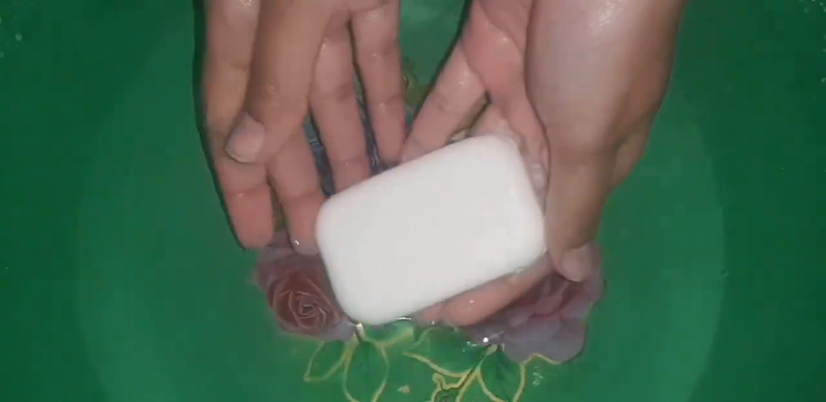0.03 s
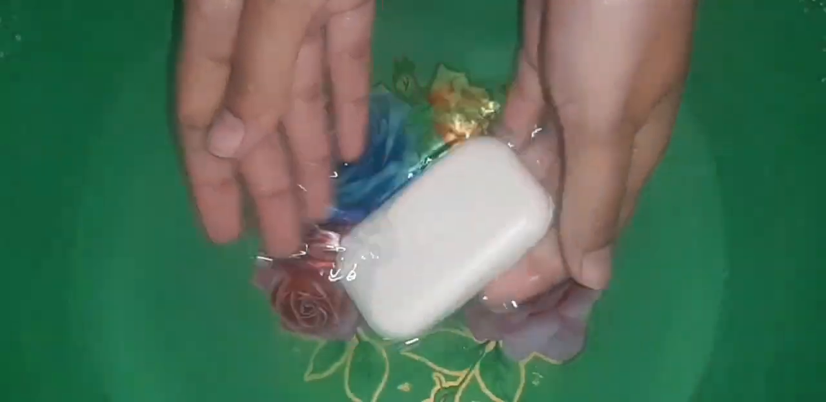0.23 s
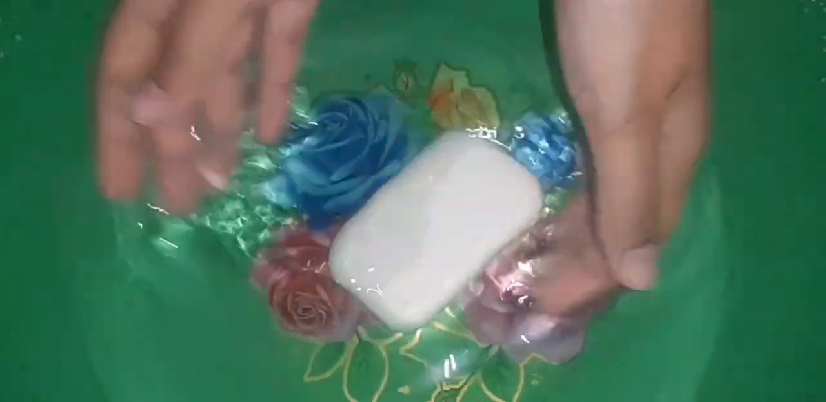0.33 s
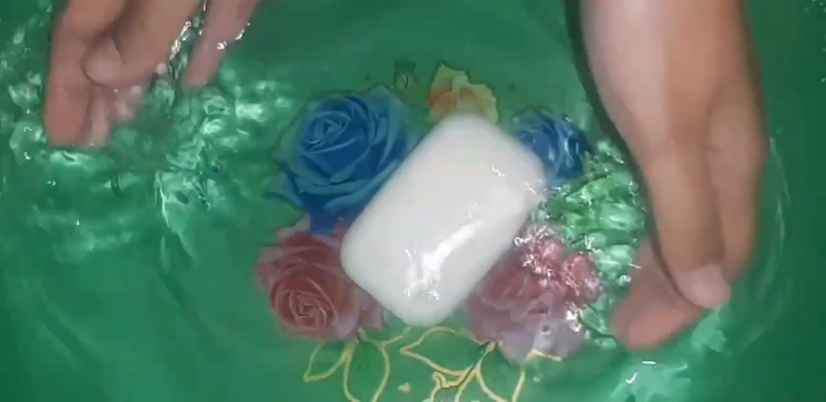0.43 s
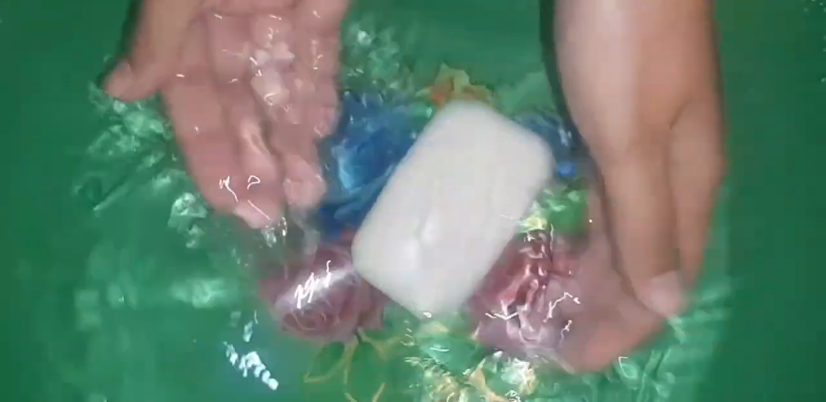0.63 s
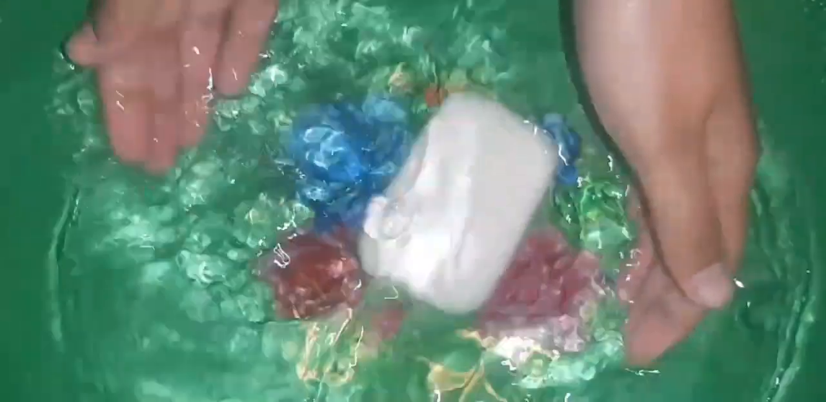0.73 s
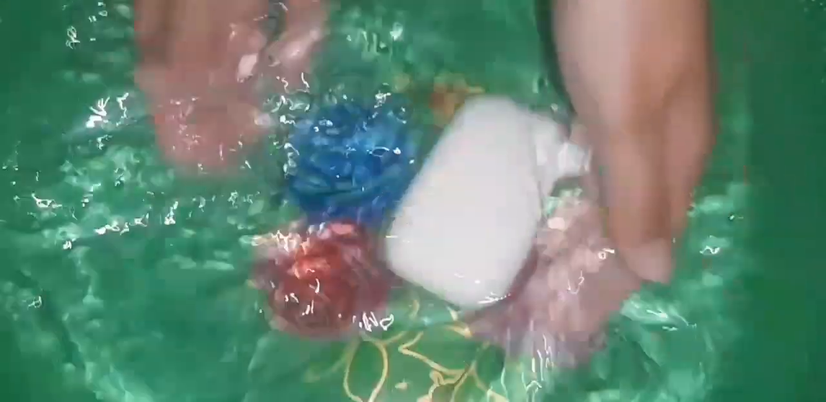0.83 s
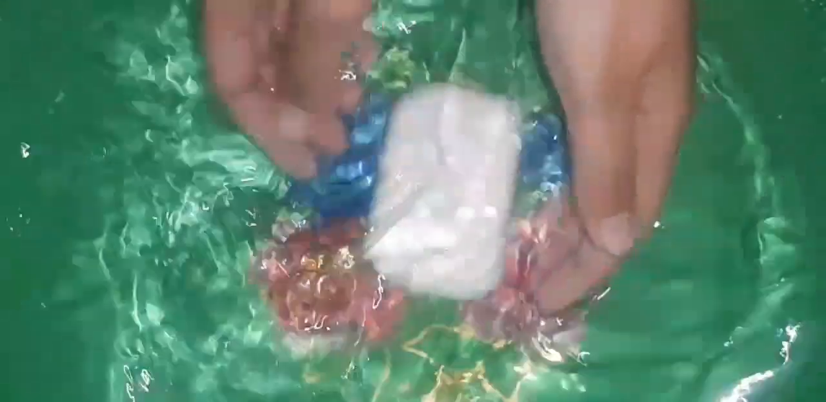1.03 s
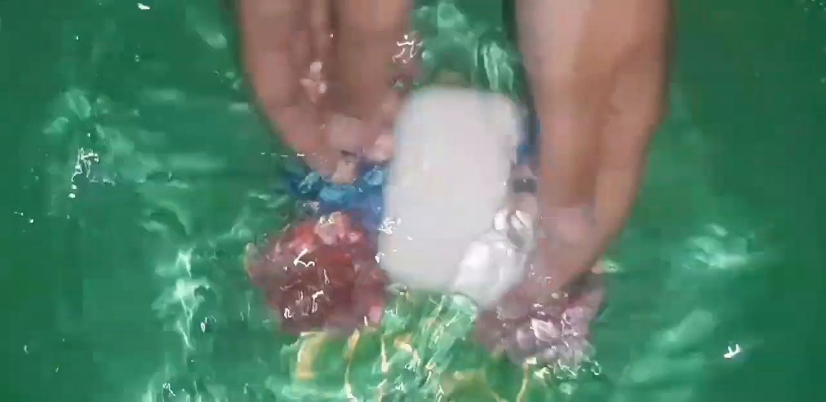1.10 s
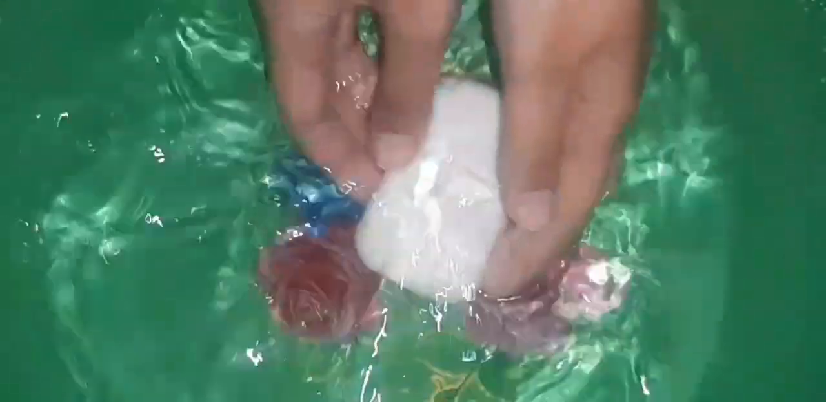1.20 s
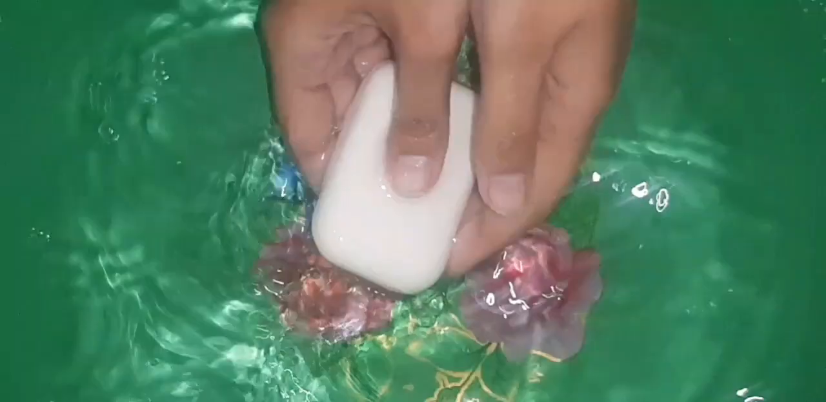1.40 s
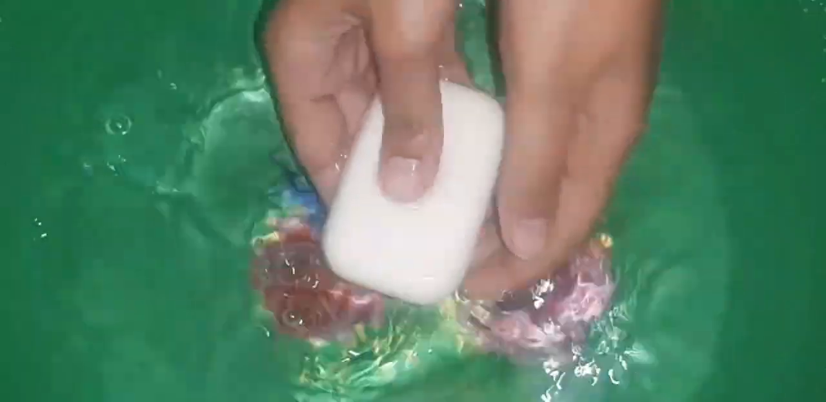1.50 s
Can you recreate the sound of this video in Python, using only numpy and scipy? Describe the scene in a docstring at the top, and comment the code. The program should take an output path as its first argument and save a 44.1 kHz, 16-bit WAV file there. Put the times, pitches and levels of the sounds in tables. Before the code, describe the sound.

Water splashes and plops in a plastic basin. First a bar of soap knocks hollowly on the bottom, then a hand splashes in with a brief fizz, thinning into faint drips, heard close in a small, quiet room.

```python
"""Four hollow knocks come first: a bar of soap strikes the bottom of a plastic basin of water and
excites its bending modes, later nudging it faintly. A hand splashes in, and trapped air pockets
resonate as plops of rising pitch; the splash fizzes, then thins into drips and soft lapping.
A small hard-walled room answers with reflections and a short reverberation, over a faint steady hiss."""
import sys
import numpy as np
from scipy import signal
from scipy.fft import rfft, irfft
from scipy.io import wavfile

SR = 44100
rng = np.random.default_rng(int(sys.argv[2]) if len(sys.argv) > 2 else 0)


def materialize(psi):
    """Save the field psi as 16-bit PCM at rate SR to the path in sys.argv[1].

    A 1-D psi becomes a single channel; in a 2-D psi each row is a channel.
    """
    bounded = np.clip(np.atleast_2d(psi).T, -1, 1)
    quanta = np.round(bounded * 32767).astype(np.int16)
    wavfile.write(sys.argv[1], SR, quanta)


N = 68355

# modes of the filled basin: (frequency [Hz], level [dB], base decay time T60 [s])
BASIN_MODES = [(237.3, -16.5, 0.2), (243.2, -5, 0.16), (282.3, -9.5, 0.16), (369, -5.5, 0.063),
               (424.2, -17, 0.17), (447.2, -2.5, 0.075), (478.8, -10, 0.061), (640, -14, 0.057),
               (732, -9, 0.04), (841.3, -3.5, 0.041), (906.5, -15, 0.041), (1106, -3, 0.031),
               (1284, 2.5, 0.018), (1534, -4, 0.031), (2133, 0, 0.012), (2209, -11.5, 0.041)]
# blows of the soap: (time [s], level [dB], contact bandwidth [Hz], low-mode gain [dB],
# favoured frequency [Hz], weakened frequency [Hz], low-mode lag [ms], low-mode decay factor [ratio],
# relative crack level [dB], left minus right [dB])
SOAP_BLOWS = [(0.2075, -9.5, 2600, 1, 882, 356, 1.3, 1, -16, 2.5),
              (0.3481, -13, 1049, -1, 403, 855, 0.48, 0.49, -32.5, 3),
              (0.3944, -16, 1650, -1.5, 630, 860, 5.1, 0.89, -39, 4),
              (0.4229, -9.5, 1280, -6.5, 409, 2150, 1.2, 0.49, -26, 0.5),
              (0.811, -39.5, 270, 3, 233.6, 450, 2.08, 0.79, -43, 8),
              (0.8227, -22.5, 2000, -19, 1228, 426, 0.36, 0.77, -14.5, 4),
              (1.101, -49.5, 1506, -3.5, 1230, 448, 1.45, 1, -32.5, 9)]


def soap_knocks(low_mode_hz=422, spot_octaves=0.11, favoured_db=7, weakened_db=-4.5, right_lag_ms=0.16):
    """Modal vibration: the contact spot weights the modes, and the low, water-loaded ones arrive later."""
    out, t = np.zeros((2, N)), np.arange(SR // 3) / SR
    for (start, db, bright_hz, low_db, favoured_hz, weakened_hz,
         lag_ms, stretch, crack_db, pan_db) in SOAP_BLOWS:
        sound = undb(crack_db) * tick(t, decay_s=0.0037, high_hz=bright_hz * 1.3, low_hz=700)
        for hz, mode_db, t60 in BASIN_MODES:
            lowness = 1 / (1 + (hz / low_mode_hz / 1.6) ** 4)  # near 1 for low modes, 0 for high
            width = 1 - lowness / 2  # low modes sit nearer the centre
            octaves_off = np.log2(hz / np.array([favoured_hz, weakened_hz]))
            favoured, weakened = np.exp(-(octaves_off / spot_octaves) ** 2)
            gain = undb(mode_db + lowness * low_db + favoured * favoured_db + weakened * weakened_db)
            gain /= np.sqrt(1 + (hz / bright_hz) ** 6)
            mode_lag_ms = lag_ms * min(low_mode_hz / hz, 1) ** 1.2
            delay_s = (mode_lag_ms + np.array([[0], [right_lag_ms * width]])) / 1000
            decay_s = t60 * stretch ** lowness / np.log(1000)
            sound += gain * pan(pan_db * width) * ring(t - delay_s, hz, decay_s, rise=0, swell=0.95)
        add(out, start, undb(db) * sound)
    return butterworth(out, 5, 180, "high")  # the basin radiates little deep bass


PINCH_CYCLES, PINCH_S = 1.03, 0.00022  # onset of a bubble's tone: a part in periods, a part in seconds
# bubbles and drips, plus a soft ring after the first knock (0.25 s) and one drip's quick echo (0.5513 s):
# (time [s], starting frequency [Hz], level [dB], decay time [ms], initial rise [octaves/s],
# relative snap level [dB], left minus right [dB], right-side lag [ms])
PLOPS_AND_RINGS = [(0.194, 5000, -40.5, 2.2, 3.1, 0, 4.5, 0.036), (0.25, 902, -27.5, 11.7, 1, -38, 2.5, 0),
                   (0.433, 6270, -49.5, 1.1, 20, -28, -9, 0), (0.4705, 870, -27, 3, 5, -28, 0.5, 0),
                   (0.497, 6820, -34.5, 0.5, 5.4, -10.5, 2.5, 0),
                   (0.5262, 1284, -29, 2.7, 20, -35.5, -4, 0),
                   (0.5497, 2705, -4.5, 1.14, 4, -51, -3.5, -.06),
                   (0.5513, 2470, -15, 1.5, 4, -45.5, 5, -.05), (0.577, 6960, -43.5, 1.5, 5, -5.5, 3, 0),
                   (0.5985, 848, -18, 5.6, 7, -28, -0.5, .15),
                   (0.6007, 5400, -32.5, 0.8, 5.5, -4.5, 1.5, 0),
                   (0.6055, 1700, -12.5, 4.4, 7, -28, -0.5, -.1), (0.6063, 6950, -27, 1.1, 12, -25, 1.5, 0),
                   (0.6212, 1057, -12.5, 6, 5, -24, 5.5, .15), (0.629, 3930, -19, 2.3, 8, -27, -8.5, .05),
                   (0.655, 3200, -10.5, 2.06, 20, -33.5, -9, .03),
                   (0.6543, 4610, -12.5, 0.56, 30, -31, -8.5, -0.025),
                   (0.6540, 11140, -42.5, 0.53, 5, -30, 4, 0.0017),
                   (0.7024, 1186, -2, 6.8, 46, -44.5, 1, .12), (0.7043, 3320, -20, 1.2, 5, -16, 0.5, 0),
                   (0.7029, 4660, -17, 0.78, 4.7, -15.5, -6, 0),
                   (0.7239, 972, -18.5, 4.9, 30, -24.5, -1, 0.13), (0.7334, 1347, -23, 6, 35, -27, -8, .1),
                   (0.7405, 1880, -22, 3.9, 26, -28.5, -1, 0.014),
                   (0.758, 5900, -32.5, 1.67, 8, -14, -3, 0), (0.763, 3590, -27, 2.3, 25, -7, -2, 0),
                   (0.8235, 1056, -14, 3.24, 8, -15.5, 1.5, -.05),
                   (0.8229, 4380, -26, 0.88, 10, -11.5, 0.5, 0), (0.866, 6880, -49, 0.81, 10, -1, 2, 0),
                   (0.9115, 4890, -20, 0.44, 20, -17.5, -5, -.05),
                   (0.963, 3860, -31.5, 0.76, 15, -11, -10, 0),
                   (1.0803, 4550, -37.5, 0.55, 10, -16, 3.5, 0), (1.1163, 1193, -43, 2.5, 19, -32, 9.5, 0),
                   (1.24, 858, -57.5, 28, 0.65, -40.5, 6, -0.064),
                   (1.348, 2586, -46, 1.77, 8.5, -24, -9, 0), (1.44, 7670, -57.5, 0.43, 10, -5, 11, -0.012)]


def plops_and_rings():
    """Damped resonance: a snap and a rising tone, as when an air pocket closes and nears the surface."""
    out, t = np.zeros((2, N)), np.arange(SR // 16) / SR
    for start, hz, db, decay_ms, rise, snap_db, pan_db, lag_ms in PLOPS_AND_RINGS:
        delay_s = np.maximum([[-lag_ms], [lag_ms]], 0) / 1000
        tone = ring(t - delay_s, hz, decay_ms / 1000, rise, swell=PINCH_CYCLES + PINCH_S * hz)
        snap = undb(snap_db) * tick(t, decay_s=0.0011, high_hz=4300 + hz / 2, low_hz=hz)
        add(out, start, undb(db) * pan(pan_db) * (tone + snap))
    return out


def tiny_bubble(t, hz, place, phase, decay_cycles, swell):
    """Damped resonance of one bubble in a cloud, placed by level and phase differences between sides."""
    delay_s = np.array([[phase], [1 - phase]]) / hz / 2
    return pan(3.5 * (2 * place - 1)) * ring(t - delay_s, hz, decay_cycles / hz, rise=15, swell=swell)


# how hard the water is stirred: (time [s], level [dB])
STIRRING = [(0, -90), (.2, -60.5), (0.301, -60), (.44, -47), (0.521, -45.5), (0.589, -39), (0.603, -25.5),
            (0.629, -18.5), (0.642, -34.5), (0.692, -33.5), (0.714, -25.5), (0.762, -55.5), (0.823, -42),
            (0.902, -49), (0.997, -66), (1.12, -55), (1.3, -59.5), (1.55, -88.5)]
# spectrum of water pushed about by the hand: (frequency [Hz], relative spectral level [dB])
SLOSH_SPECTRUM = [(100, -28.5), (230, -3.5), (380, -11), (600, 0), (900, -1), (1500, -1.5), (2500, -10.5),
                  (5000, -20.5), (9000, -42), (15000, -64.5)]


def splash(bubbles_per_s=650, low_hz=766, high_hz=5200, tilt_db_per_octave=-4):
    """Air entrainment: stirred water sloshes and sheds tiny bubbles, both louder with harder stirring."""
    out, t = np.zeros((2, N)), np.arange(SR // 40) / SR
    times, stir_db = np.array(STIRRING).T
    slosh_db = np.interp(np.arange(N) / SR, times, stir_db) - 8
    slosh = undb(slosh_db) * noise(colour(SLOSH_SPECTRUM), wide_hz=593)
    for when, pitch, strength, place, phase in rng.random((int(bubbles_per_s * N / SR), 5)):
        start = when * N / SR
        hz = low_hz * (high_hz / low_hz) ** pitch
        db = np.interp(start, times, stir_db) - 11 + tilt_db_per_octave * np.log2(hz / low_hz)
        scatter_db = -5 * np.log(max(strength, .04))  # a few bubbles stand out
        tone = tiny_bubble(t, hz, place, phase, decay_cycles=5.3, swell=PINCH_CYCLES)
        add(out, start, undb(db + scatter_db) * tone)
    return out + slosh


# moments when the surface tears: (time [s], duration [s], level [dB])
SURFACE_TEARS = [(0.599, 0.035, -37.5), (0.682, 0.0071, -47), (0.702, 0.027, -35), (0.757, 0.0092, -42)]


def fizz(bubbles_per_s=1400, low_hz=3314, high_hz=10500, tilt_db_per_octave=-8.5):
    """Superposition: where the surface tears, the brief tones of minute bursting bubbles merge."""
    out, t = np.zeros((2, N)), np.arange(SR // 100) / SR
    for start, duration, db in SURFACE_TEARS:
        for k, (when, pitch, strength, place, phase) in enumerate(rng.random((256, 5))):
            after_s = (k + when) / bubbles_per_s
            if after_s < duration:
                hz = low_hz * (high_hz / low_hz) ** pitch
                scatter_db = -4.5 * np.log(max(strength, .04))
                gain = undb(db + tilt_db_per_octave * np.log2(hz / low_hz) + scatter_db)
                tone = tiny_bubble(t, hz, place, phase, decay_cycles=4, swell=PINCH_CYCLES + PINCH_S * hz)
                add(out, start + after_s, gain * tone)
    return out


# early wall reflections: (left delay [ms], right delay [ms], level [dB])
REFLECTIONS = [(2.52, 2.4, -14.5), (6.2, 6.1, -32), (21.65, 37, -21.5), (27.6, 9.7, -27.5), (47.2, 44, -26),
               (70.8, 93, -30.5)]
# spectrum of the reverberant tail: (frequency [Hz], relative level [dB])
TAIL_SPECTRUM = [(100, -10.5), (240, 4), (500, 2.5), (900, 0), (1500, -5), (3000, 0), (6000, -5),
                 (12000, -15)]


def room_response(low_t60_s=0.3, treble_t60_s=0.31, build_s=0.0027, tail_db=-9):
    """Reverberation: a few discrete wall reflections and a diffuse field that decays exponentially."""
    t, spectrum = np.arange(N) / SR, colour(TAIL_SPECTRUM)
    diffuse = noise(spectrum, wide_hz=544.2)
    low = butterworth(diffuse, 1, 2500, "low")
    tail = low * undb(-60 * t / low_t60_s) + (diffuse - low) * undb(-60 * t / treble_t60_s)
    tail *= 1 - np.exp(-(t / build_s) ** 2)
    tail /= np.sqrt(np.sum(tail ** 2) / 2)  # unit energy per side
    response = undb(tail_db) * tail * np.sqrt(np.mean(spectrum ** 2))
    for left_ms, right_ms, db in REFLECTIONS:
        delay_s = np.array([[left_ms], [right_ms]]) / 1000
        response += undb(db) * np.sinc((t - delay_s) * SR)
    return response


# spectrum of the room's steady noise: (frequency [Hz], relative spectral level [dB])
AMBIENT_SPECTRUM = [(25, -10.5), (55, -15.5), (100, -4.5), (165, 3), (240, 2), (400, -3), (700, -11.5),
                    (1500, -16.5), (2800, -19), (4000, -19), (7000, -30.5), (10000, -38.5), (15000, -49)]


def background(floor_db=-64.5, whine_db=-62, whine_hz=2298, whine_width_hz=130):
    """Stationary noise: a quiet broadband floor and a narrow band of hiss, heard as a whine."""
    band = np.exp(-((np.fft.rfftfreq(N, 1 / SR) - whine_hz) / whine_width_hz) ** 2 / 2)
    floor = undb(floor_db) * noise(colour(AMBIENT_SPECTRUM), wide_hz=710)
    return floor + undb(whine_db) * noise(band, wide_hz=710)


def ring(t, hz, decay_s, rise, swell):
    """Damped oscillation from t = 0, building over `swell` cycles, first gliding at `rise` octaves/s."""
    t = np.maximum(t, 0)
    phase = 2 * np.pi * hz * (t + np.log(2) * rise * t * t / 2)
    onset = 1 - np.exp(-(t * hz / swell) ** 2)
    return np.sin(phase) * np.exp(-t / decay_s) * onset


def tick(t, decay_s, high_hz, low_hz):
    """Band-limited transient: a burst of noise with a fast exponential decay."""
    burst = rng.standard_normal((2, len(t))) * np.exp(-t / decay_s)
    thinned = butterworth(burst, 4, low_hz, "high")
    return 2 * butterworth(thinned, 6, min(high_hz, SR / 3), "low")


def noise(gain, wide_hz):
    """Partial coherence: shaped stereo noise of rms 1, alike on both sides below wide_hz."""
    hz = np.fft.rfftfreq(N, 1 / SR)
    mid, side = rfft(rng.standard_normal((2, N)))
    side = side * hz ** 2 / (hz ** 2 + wide_hz ** 2)
    x = irfft(np.array([mid + side, mid - side]) * gain, N)
    return x / x.std()


def colour(points):
    """Spectral envelope: gain per bin from (frequency [Hz], level [dB]) points."""
    hz, db = np.array(points, float).T
    return undb(np.interp(np.log(np.fft.rfftfreq(N, 1 / SR) + 1), np.log(hz), db))


def butterworth(x, order, hz, kind):
    """Maximally flat low-pass or high-pass filtering."""
    return signal.sosfilt(signal.butter(order, hz, kind, fs=SR, output="sos"), x)


def undb(db):
    """Amplitude ratio of a level in decibels."""
    return 10 ** (np.asarray(db) / 20)


def pan(db):
    """Level difference as left and right gains."""
    return undb(np.array([[db], [-db]]) / 2)


def add(out, start, sound):
    """Superposition of a stereo sound at a time in seconds."""
    i = int(np.clip(start * SR, 0, N - 1))
    out[:, i:i + sound.shape[1]] += sound[:, :N - i]


def scene():
    """Convolution: the direct sound of soap and water is joined by the room's answer and steady noise."""
    response, ambient = room_response(), background()
    direct = soap_knocks() + plops_and_rings() + splash() + fizz()
    reverberant = signal.fftconvolve(direct, response, axes=1)[:, :N]
    return direct + reverberant + ambient


def record(dry, bass_hz=90, top_hz=15700):
    """Band limiting: the deep bass is thinned and the highest treble cut steeply."""
    thinned = butterworth(dry, 2, bass_hz, "high")
    return signal.sosfilt(signal.ellip(8, .2, 70, top_hz, fs=SR, output="sos"), thinned)


dry = scene()
out = record(dry)
materialize(out)
```